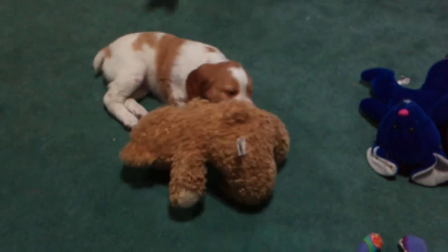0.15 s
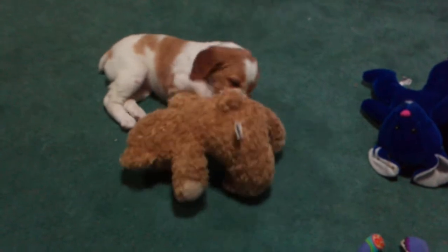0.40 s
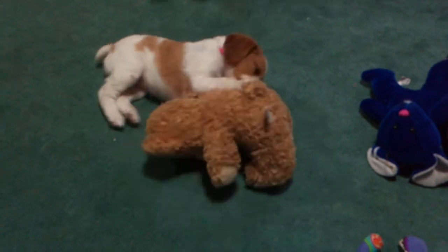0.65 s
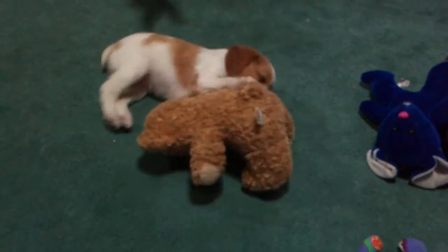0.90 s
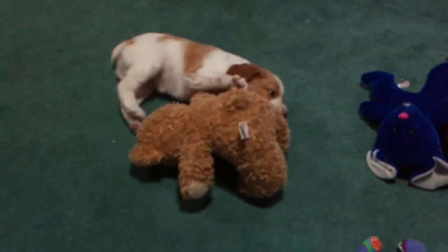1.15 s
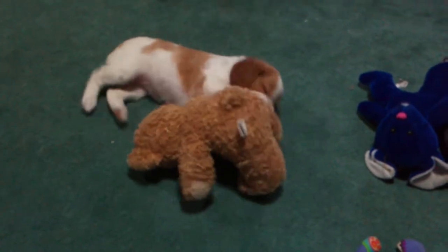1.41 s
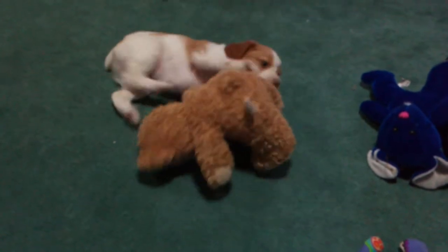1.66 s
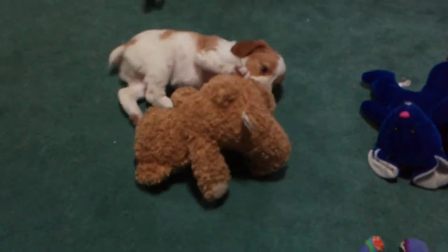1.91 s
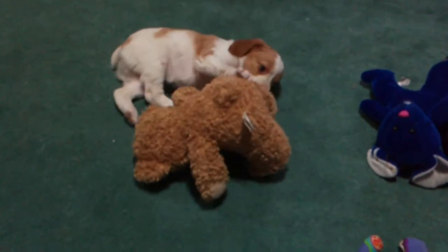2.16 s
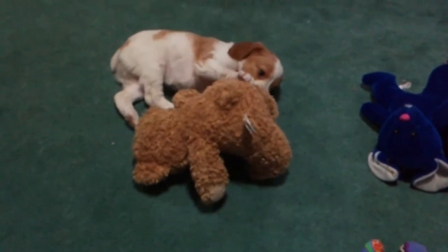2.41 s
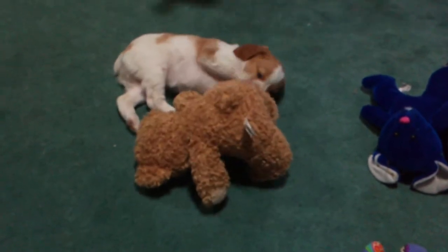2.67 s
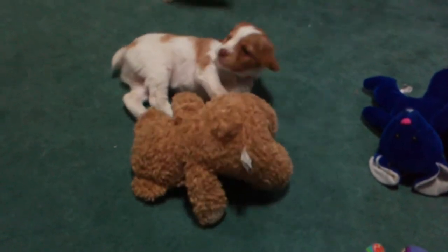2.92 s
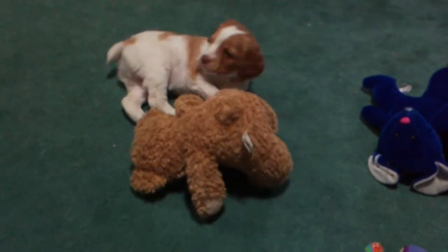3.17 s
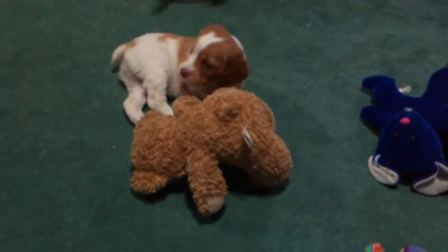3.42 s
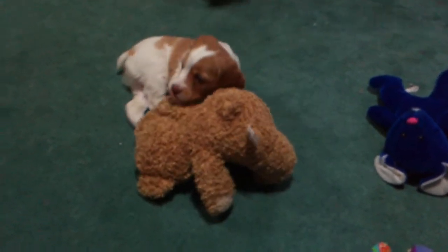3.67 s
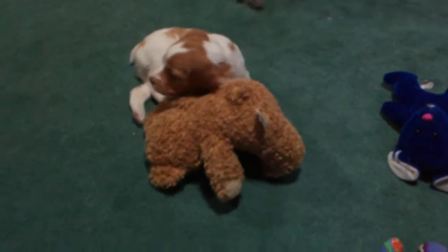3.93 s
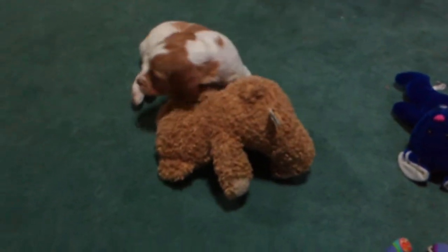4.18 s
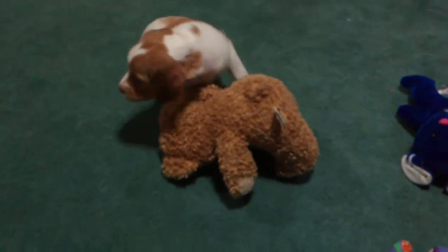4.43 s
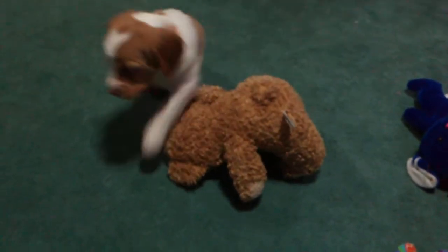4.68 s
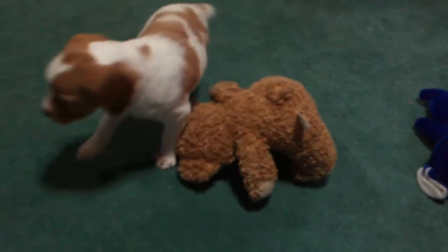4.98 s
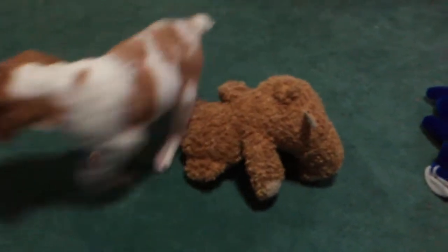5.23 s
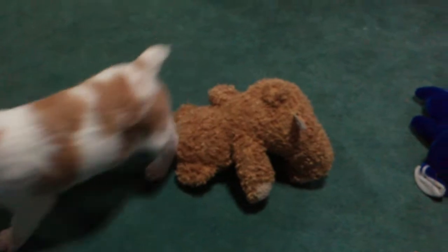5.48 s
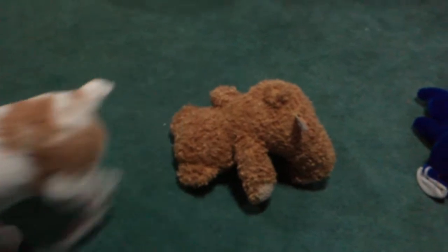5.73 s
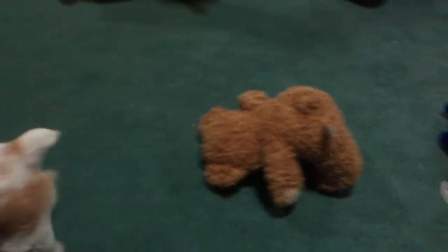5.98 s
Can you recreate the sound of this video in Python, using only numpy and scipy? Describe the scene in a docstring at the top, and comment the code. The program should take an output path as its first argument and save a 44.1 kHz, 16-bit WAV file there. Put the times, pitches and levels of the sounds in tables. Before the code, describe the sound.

Playful puppy growls, muffled and throaty, jump in pitch and turn rough, with faint paw thumps and tiny clicks over soft room hiss.

```python
"""A puppy growls in play with its mouth in a plush toy: unevenly beating vocal folds, often in strong-weak pairs,
send pulses and breath noise through chest, throat, mouth and lips; the roughest beats add a snarl.
A thin squeak slides up in the last growl; paws thud as short low rings, jaws and claws click.
A quiet carpeted room adds short decaying noise echoes, wavering household rumble and microphone hiss."""
import sys
import numpy as np
from scipy import signal
from scipy.fft import rfft, irfft, next_fast_len
from scipy.io import wavfile
from scipy.ndimage import uniform_filter1d, map_coordinates

SR = 44100
rng = np.random.default_rng(int(sys.argv[2]) if len(sys.argv) > 2 else 0)


def store_wav(level_fs):
    """Save 16-bit WAV to argv[1]."""
    pcm = np.round(np.clip(np.atleast_2d(level_fs), -1, 1) * 32767)
    wavfile.write(sys.argv[1], SR, pcm.T.astype(np.int16))


def gain_from_db(level_db):
    """Convert decibel levels to linear amplitude factors (20 dB per decade)."""
    decades = np.asarray(level_db, float) / 20
    return 10 ** decades


N = 268921


def unit(x):
    """Scaled to rms 1."""
    return x / np.sqrt(np.mean(x ** 2) + 1e-20)


def along(points, hz):
    """Interpolates (f/Hz, value) points on a log frequency axis."""
    f, v = np.transpose(points)
    return np.interp(np.log(hz + 1), np.log(f + 1), v)


def wobble(rate_hz):
    """A smooth random curve, rate_hz knots a second."""
    knots = rng.standard_normal(int(N * rate_hz / SR) + 4)
    return map_coordinates(knots, [np.arange(N) * rate_hz / SR])


def filtered(x, response):
    """x times a complex response of frequency."""
    m = next_fast_len(N + SR // 2)
    return irfft(rfft(x, m) * response(np.fft.rfftfreq(m, 1 / SR)), m)[..., :N]


def bandpass(f, center_hz, width_hz):
    """Response of one damped resonance, 1 at its center."""
    return 1j * f * width_hz / (center_hz ** 2 - f * f + 1j * f * width_hz)


def resonant(x, modes):
    """x through resonances of alternating sign, applied twice so that the valleys stay dark; rms 1."""
    def bank(f):
        return sum((-1) ** k * gain_from_db(db / 2) * bandpass(f, c, w) for k, (c, w, db) in enumerate(modes))
    return unit(filtered(x, lambda f: bank(f) ** 2))


# household rumble spectrum: f/Hz, relative density/dB
RUMBLE = [(12, -26), (20, -4.5), (86, 5), (306, -4), (548, -8.5), (849, -12.5), (982, -10.5), (1140, -14.5),
          (2900, -17.5), (3770, -16), (6380, -120)]
# microphone hiss spectrum: f/Hz, relative density/dB
HISS = [(1710, -34), (2900, -8), (3490, -6), (4850, -2), (9260, -3), (10800, -5), (12100, -24),
        (15800, -52), (22000, -120)]


def room_tone():
    """Steady microphone hiss over a low household rumble that wavers: shaped Gaussian noises."""
    hiss_db, rumble_db = -64, -56
    waver_under_hz, waver_db, waver_rate_hz = 900, 1.86, 11

    def noise(spectrum):
        return unit(filtered(rng.standard_normal(N), lambda hz: gain_from_db(along(spectrum, hz))))
    rumble = noise(RUMBLE)
    low = filtered(rumble, lambda hz: 1 / (1 + (hz / waver_under_hz) ** 4))
    wavering = rumble - low + gain_from_db(waver_db * wobble(waver_rate_hz)) * low
    return gain_from_db(hiss_db) * noise(HISS) + gain_from_db(rumble_db) * wavering


# room decay: f/Hz, t60/s
WALLS = [(150, .2), (1000, .2), (5000, .12)]


def walls(x):
    """Room answer: a noise tail in which each frequency dies at its own speed."""
    hz, t, z = signal.stft(rng.standard_normal(SR // 2), SR, nperseg=256)
    tail = signal.istft(z * gain_from_db(-60 * t / along(WALLS, hz)[:, None]), SR, nperseg=256)[1]
    delay = 250  # samples
    return signal.fftconvolve(np.pad(x, (delay, 0)), tail / np.linalg.norm(tail))[:N]


# paw thuds: t/s, relative level/dB, f/Hz
THUDS = [(0.096, -30, 109), (0.197, -33.5, 128), (0.373, -38, 104), (0.465, -33.5, 92.5), (0.825, -44, 80),
         (0.948, -51.5, 124), (1.498, -60, 97), (1.754, -43, 88), (2.478, -37, 113), (3.294, -39.5, 88.59),
         (3.824, -33, 93), (4.407, -50, 108.3), (4.646, -40.5, 97), (4.746, -39.5, 102),
         (5.709, -30.5, 101), (5.758, -33, 96)]


def paws():
    """A soft push on the boards under the carpet: a few low cycles."""
    gain_db, t60_s, onset_s = 2, .09, .005
    out, t = np.zeros(N + SR), np.arange(SR // 5) / SR
    for s, db, hz in THUDS:
        ring = -np.sin(2 * np.pi * hz * t) * gain_from_db(-60 * t / t60_s) * (1 - np.exp(-t / onset_s))
        out[round(s * SR):][:len(t)] += gain_from_db(db + gain_db) * ring
    return out[:N]


# jaw and claw clicks: t/s, nominal level/dB, f/Hz
SMACKS = [(1.011, -59, 677), (1.021, -53, 1240), (3.818, -45.5, 1230), (5.811, -48, 1390),
          (3.412, -44, 2600), (4.579, -43, 7850), ]


def smacks():
    """Small wet clicks of jaws and claws: two close tones, damped."""
    out, t = np.zeros(N + SR), np.arange(SR // 50) / SR
    for s, db, hz in SMACKS:
        t60_s = 0.0047 + 39 / hz  # a fixed time plus 39 cycles
        ring = np.sin(2 * np.pi * hz * t) + 0.5 * np.sin(2 * np.pi * 0.91 * hz * t)
        out[round(s * SR):][:len(t)] += gain_from_db(db - 60 * t / t60_s) * (1 - np.exp(-t * hz / 0.26)) * ring
    return out[:N]


# squeaky streak in the last growl: t/s, level/dB, f/Hz
SQUEAK = [(5.845, -75, 3300), (5.856, -59, 3330), (5.89, -58, 3400), (5.93, -64, 3580), (5.95, -78, 3600)]


def squeak():
    """A thin unsteady tone that slides up: a sine with jittered pitch and level."""
    t = np.arange(N) / SR
    s, db, hz = np.transpose(SQUEAK)
    pitch_hz = np.interp(t, s, hz) * (1 + .02 * wobble(300))
    level_db = np.interp(t, s, db, -120, -120) + 4 * wobble(80)
    return gain_from_db(level_db) * np.sin(2 * np.pi * np.cumsum(pitch_hz) / SR)


# vocal folds: t/s, f/Hz, roughness/0-1
FOLDS = [(0, 175, .2), (.25, 168, .22), (.45, 160, .3), (.6, 163, .5), (.8, 170, .45), (1.1, 160, .45),
         (1.22, 172, .35), (1.9, 169, .28), (2.02, 160, .35), (2.33, 166, .4), (2.52, 174, .35),
         (2.58, 202, .22), (2.69, 203, .22), (2.78, 182, .22), (3, 174, .4), (3.13, 167, .5),
         (3.15, 170, .85), (3.45, 155, .85), (3.55, 158, .5), (3.69, 150, .5), (3.78, 178, .5),
         (3.84, 182, .4), (3.905, 247, .2), (4.04, 251, .2), (4.17, 245, .25), (4.225, 243, .25),
         (4.245, 162, .5), (4.5, 162, .55), (4.88, 164, .5), (5.3, 170, .5), (5.45, 170, .3),
         (5.52, 170, .3), (5.56, 248, .25), (5.66, 244, .3), (5.82, 246, .4), (5.94, 243, .45),
         (5.98, 218, .5), (6.1, 204, .42)]


def folds():
    """Fold beats: cycle count with pitch jitter that grows with roughness; octaves from resting pitch."""
    resting_hz = 165
    t = np.arange(N) / SR
    when, *columns = np.transpose(FOLDS)
    hz, rough = [np.interp(t, when, column) for column in columns]
    jitter = rough * (.06 * wobble(70) + .02 * wobble(15))
    cycles = np.cumsum(hz * (1 + jitter)) / SR
    return cycles, rough, np.log2(hz / resting_hz)


def glottis(cycles, rough):
    """Closing pulses, strong-weak and uneven when rough, mixed with one puff of air a cycle."""
    closing = np.flatnonzero(np.diff(np.floor(cycles)))
    strong_weak = 1 + np.minimum(1.1 * rough[closing], 1) * (-1.) ** np.arange(len(closing))
    pulses = np.zeros(N)
    pulses[closing] = strong_weak * gain_from_db(3.5 * rough[closing] * rng.standard_normal(N)[closing])
    puffs = unit(np.exp(-3 * (cycles % 1)) * rng.standard_normal(N))
    air_share = np.clip(1.55 * rough, 0, 1)
    drive = np.sqrt(1 - air_share) * unit(pulses) + np.sqrt(air_share) * puffs
    return drive, puffs


# chest resonances: f/Hz, single-pass width/Hz, relative level/dB
CHEST = [(99, 82, -21), (240, 76, 2.5), (310, 43.5, 4.5), (451, 360, -14)]


def low_tones(effort_db, cycles, rough, octaves, drive):
    """Fundamental and octave of the folds, tones of the strong-weak pairs, and the chest resonances."""
    turn = 2 * np.pi * cycles
    first = gain_from_db(effort_db - 3.5 + 2 * rough)
    octave = gain_from_db(effort_db - 12 - 37.5 * octaves)
    chest = gain_from_db(effort_db - 14 + 12.5 * rough + 6 * octaves)
    sway = 1.4 * np.minimum(rough, .6) * wobble(55)  # pushes the fundamental early and late
    tones = first * np.sin(turn + sway)
    tones = tones + octave * gain_from_db(2.2 * wobble(40)) * np.sin(2 * turn + 1.32 * wobble(30))
    uneven = drive - 0.5 * np.interp(cycles - 1, cycles, drive)  # differs from beat to beat
    pair = np.sin(1.5 * turn + 1.7 * wobble(30)) + gain_from_db(-19) * np.sin(turn / 2)
    pair_gain = gain_from_db(-7.5 - 65 * octaves)
    return tones + chest * (pair_gain * pair + gain_from_db(-1.5) * resonant(uneven, CHEST))


# throat resonances, jaw shut and open: f/Hz, single-pass width/Hz, relative level/dB
THROAT_SHUT = [(400, 29, 0.23), (600, 187, 9.5)]
THROAT_OPEN = [(661, 164, -5), (769, 153, 6.5)]


def throat(drive, gape):
    """Throat resonances, crossfaded from shut to open as the jaw opens."""
    shut, wide = resonant(drive, THROAT_SHUT), resonant(drive, THROAT_OPEN)
    return np.sqrt(1 - gape) * shut + np.sqrt(gape) * wide


# mouth resonances, full of plush and clear: f/Hz, single-pass width/Hz, relative level/dB
MUFFLED = [(1161, 340, 2.5), (1503, 220, 6.15)]
MOUTH = [(1300, 335, 2.2), (1600, 171, 9.65), (2083, 1140, 0.37)]


def mouth(drive, clear):
    """Mouth resonances, crossfaded from plush to clear; little passes far above the edge."""
    edge_hz = 1650
    muffled, free = resonant(drive, MUFFLED), resonant(drive, MOUTH)
    mixed = np.sqrt(1 - clear) * muffled + np.sqrt(clear) * free
    return filtered(mixed, lambda f: 1 / np.sqrt(1 + (f / edge_hz) ** 9))


# lip resonance: f/Hz, single-pass width/Hz, relative level/dB
LIPS = [(2950, 1500, 0)]


def rasp(puffs, mouth_db, clear, rough, octaves):
    """Air past the lips: grows faster than the mouth level and with clear lips, falls with roughness and pitch."""
    level_db = -62.5 + 1.6 * (mouth_db + 45)
    level_db = level_db + 10 * (clear - .5) - 8 * (rough - .3) - 19 * octaves
    return gain_from_db(level_db) * resonant(puffs, LIPS)


# gullet resonances, lower and upper: f/Hz, single-pass width/Hz, relative level/dB
SNARL_LOW = [(500, 300, 0)]
SNARL = [(1205, 140, 0), (1745, 510, 0)]


def snarl(puffs, effort_db, opening_db, rough):
    """Air puffs through a wide-open gullet when the folds beat at their roughest."""
    from_rough = 0.55
    level = gain_from_db(effort_db + 4.5) * np.clip((rough - from_rough) / (1 - from_rough), 0, 1)
    upper_gain = gain_from_db(np.minimum(opening_db + 4, 0))
    return level * (resonant(puffs, SNARL_LOW) + upper_gain * resonant(puffs, SNARL))


def nose(x):
    """The nose passages swallow a band: a partial notch."""
    hollow_hz, width_hz, depth = 980, 240, .6
    return filtered(x, lambda f: 1 - depth * bandpass(f, hollow_hz, width_hz))


# growls in stretches (a long growl may run on into the next list): t/s, effort level/dB,
# opening (upper voice over effort) level/dB, throat resonance f/Hz (steers the jaw), lips clear of plush/0-1
GROWLS = [
    [(0.0, -33.5, -5.5, 710, 0.1), (0.036, -51, 0.5, 670, 0.06), (0.08, -34.5, -12, 690, 0.2),
     (0.102, -43, 0, 676, 0.03), (0.168, -38, -9, 630, 0.2), (0.21, -45.5, -2, 670, 0.04),
     (0.4, -42, -10.5, 640, 0.35)],
    [(0.4, -46.5, -7, 610, 0.4), (0.454, -43, -8, 630, 0.3), (0.47, -43.5, -8.5, 620, 0.35),
     (0.546, -48, -6, 660, 0.06), (0.616, -49.5, -2.5, 612, 0.05), (0.668, -47, -2.5, 633, 0.2),
     (0.75, -47.5, -3, 597, 0.3), (0.802, -55, -13, 582, 0.1), (0.83, -72, -23, 600, 0.45)],
    [(1.09, -62, -4, 688, 0.45), (1.138, -47, -10, 596, 0.4), (1.234, -46, -3.5, 680, 0.48),
     (1.426, -47.5, -10, 590, 0.3), (1.508, -43.5, -3.5, 750, 0.5), (1.574, -46.5, -2.5, 640, 0.62),
     (1.68, -45.5, -1.5, 630, 0.52), (1.77, -45.5, 2, 660, 0.2), (1.87, -46, 0, 686, 0.15),
     (1.948, -46, -2, 676, 0.5), (1.998, -55.5, -2, 630, 0.7), (2.03, -76, 6, 667, 0.45)],
    [(2.33, -57, -7, 662, 0.45), (2.36, -45.5, 3.5, 720, 0.26), (2.512, -41, -4.5, 690, 0.9),
     (2.582, -38, 1, 780, 0.63), (2.686, -34, -2.5, 785, 0.4), (2.716, -40, 0, 770, 0.42),
     (2.846, -37.5, -8, 720, 0.54), (3.052, -48.5, 0.5, 690, 0.65), (3.12, -41, -7, 684, 0)],
    [(3.12, -47, -4, 630, 1), (3.14, -38, -18, 587, 0.8), (3.154, -44, -6, 573, 0.9),
     (3.188, -40.5, -9, 530, 0.8), (3.215, -41, -4.5, 540, 0.72), (3.23, -47.5, -7, 550, 0.8),
     (3.264, -45.5, -0.5, 566, 0.95), (3.288, -42, -11, 586, 1), (3.316, -53.5, 9, 590, 0.91),
     (3.335, -65, -20, 596, 0.6), (3.355, -44.5, -14, 560, 0.5), (3.386, -49.5, -16, 550, 0.4),
     (3.405, -65, -6, 546, 0.8), (3.46, -59, 1, 597, 0.8)],
    [(3.51, -59, -3, 755, 0.4), (3.57, -45.5, -2, 770, 0.5), (3.682, -50, -2, 685, 0.53),
     (3.754, -46, -11, 636, 0.2), (3.85, -43, -16, 621, 0.5), (3.902, -33.5, -14, 640, 0.9),
     (3.952, -34.5, -11, 594, 0.92), (3.98, -41, -10, 730, 0.7), (4.03, -79, 16, 721, 1)],
    [(4.17, -53, 2.5, 690, 0.3), (4.2, -33.5, -14.5, 710, 0.1), (4.216, -35, -6.5, 726, 0.45),
     (4.288, -47.5, -8, 670, 0.4), (4.342, -42, -6.5, 706, 0.43), (4.398, -46, -3, 635, 0.36),
     (4.454, -48, -9, 604, 0.7), (4.5, -69, -9, 603, 0.4)],
    [(4.87, -60, -8, 630, 0.4), (4.916, -47, -6.5, 637, 0.26), (5.032, -46.5, -3, 620, 0.3),
     (5.148, -45.5, -5.5, 624, 0.5), (5.368, -46, -9, 607, 0.27), (5.446, -43.5, -1.5, 696, 0.4),
     (5.504, -43, -8.5, 686, 0), (5.54, -57, 0, 668, 0.5)],
    [(5.54, -49.5, -0.5, 730, 0.7), (5.582, -38, -12, 690, 1), (5.614, -41, -9, 700, 0.47),
     (5.642, -64, -13, 674, 0.8), (5.67, -50, -10, 658, 0.45)],
    [(5.8, -44.5, -22, 660, 0.4), (5.824, -41.5, -6.5, 615, 1), (5.84, -43, 5, 615, 0.6),
     (5.855, -40, 6, 610, 0.4), (5.875, -36, -5, 630, 0.93), (5.9, -33.5, -3, 676, 0.57),
     (5.97, -34.5, -4.5, 670, 0.54), (6.01, -37, -2, 664, 0.4), (6.046, -34, -4.5, 655, 0.58),
     (6.098, -43.5, -2.5, 657, 0.7)],
]


def throb_gain(rough):
    """Loose tissue flaps over the folds, restarting with each stretch of growling; rough beats vary in level."""
    flap_hz = 30.5
    t = np.arange(N) / SR
    starts = np.array([stretch[0][0] for stretch in GROWLS])
    since_s = t - starts[np.maximum(np.searchsorted(starts, t, 'right') - 1, 0)]
    flap = np.abs(np.cos(np.pi * (flap_hz * since_s + .06 * wobble(8))))
    flutter = gain_from_db(np.minimum(rough, .45) * (3.2 * wobble(40) + .7 * wobble(14)))
    return flutter * (1 - np.minimum(1.6 * rough, .9) * (1 - flap) ** 1.5)


def growl():
    """Low tones of the folds, and their closing pulses with breath noise through the airway."""
    t = np.arange(N) / SR
    s, *columns = np.transpose([row for stretch in GROWLS for row in stretch])
    effort_db, opening_db, throat_hz, clear = [np.interp(t, s, column) for column in columns]
    sounding = sum((t >= stretch[0][0]) & (t <= stretch[-1][0]) for stretch in GROWLS)
    sounding = uniform_filter1d(np.minimum(sounding, 1.), SR // 50)
    gape = np.clip((throat_hz - 500) / 300 + 0.059 * wobble(14), 0, 1)  # jaw opening lifts the resonance
    clear = np.clip(clear + 0.069 * wobble(16), 0, 1)  # chewing keeps the mouth moving
    cycles, rough, octaves = folds()
    throb = throb_gain(rough)
    drive, puffs = glottis(cycles, rough)
    tones = low_tones(effort_db, cycles, rough, octaves, drive)
    upper_db = effort_db + opening_db
    mouth_db = upper_db - 3 + 12 * clear
    upper = gain_from_db(upper_db + 1 - 10.5 * clear) * throat(drive, gape)
    upper = upper + gain_from_db(mouth_db) * mouth(drive, clear)
    upper = upper + rasp(puffs, mouth_db, clear, rough, octaves)
    upper = nose(upper + throb ** 0.4 * snarl(puffs, effort_db, opening_db, rough))
    # the upper voice throbs less
    return sounding * (gain_from_db(3.0) * throb * tones + gain_from_db(-3.0) * throb ** 0.52 * upper)


def scene():
    """Puppy in the room, over the room tone."""
    near = growl() + paws() + smacks() + squeak()
    return (near + gain_from_db(-4.0) * walls(near) + room_tone())[None]


def roll_off(x):
    """The treble ends steeply here."""
    return signal.sosfilt(signal.butter(12, 12270, fs=SR, output="sos"), x)


def record(dry):
    """Delivers the finished mix."""
    return roll_off(dry)


dry = scene()
out = record(dry)
store_wav(out)
```